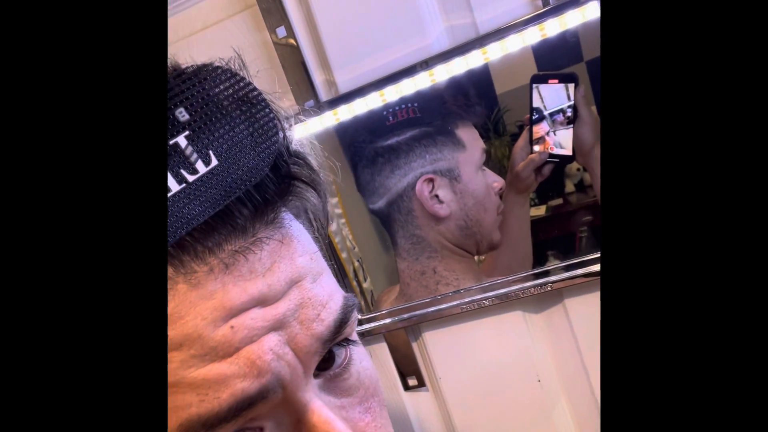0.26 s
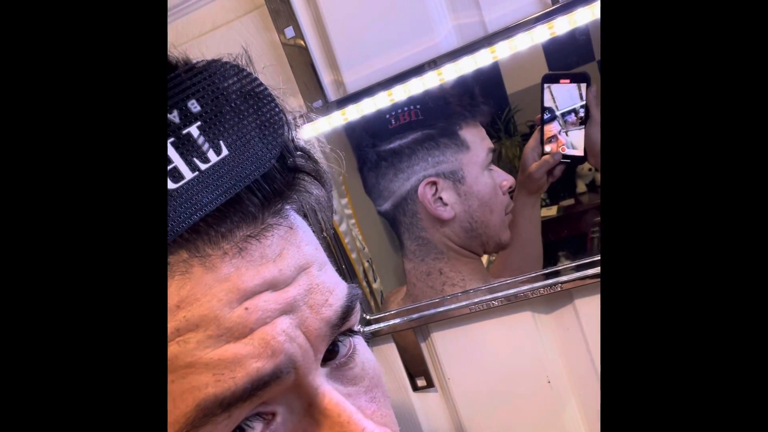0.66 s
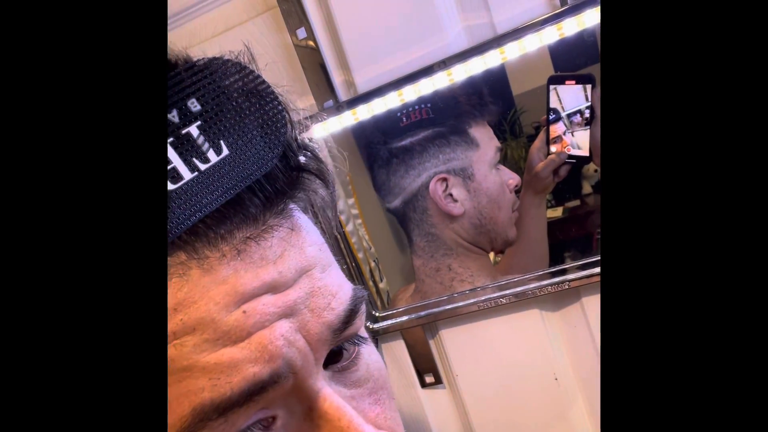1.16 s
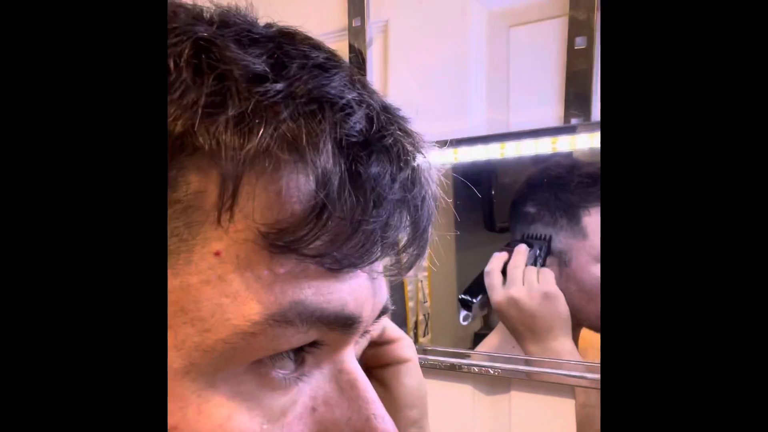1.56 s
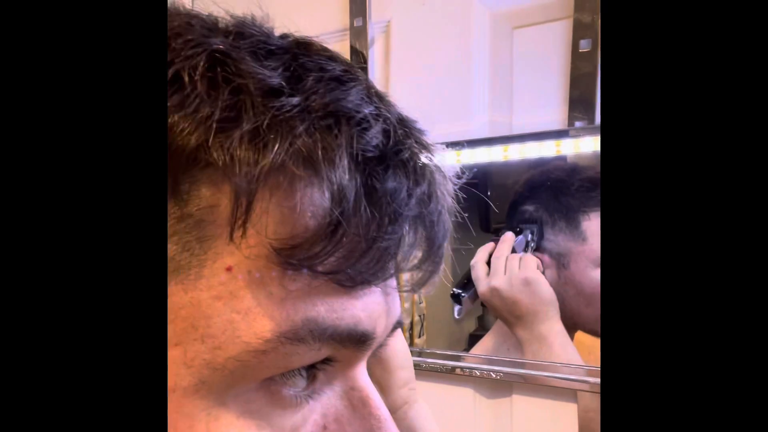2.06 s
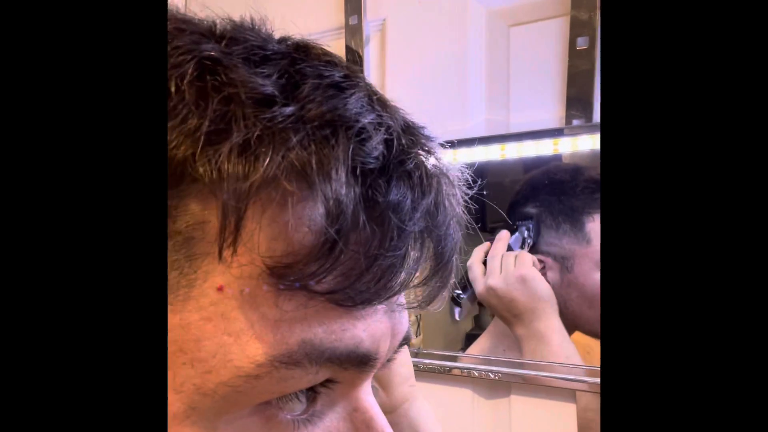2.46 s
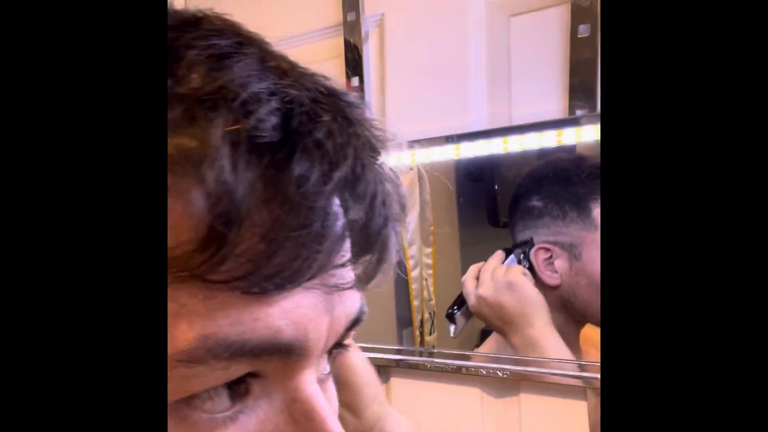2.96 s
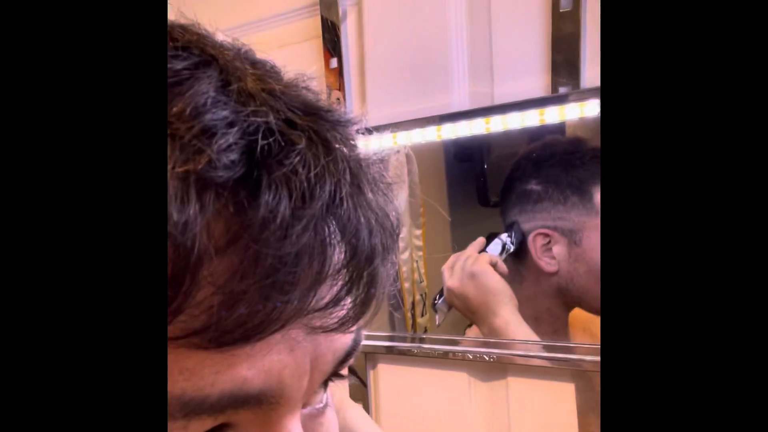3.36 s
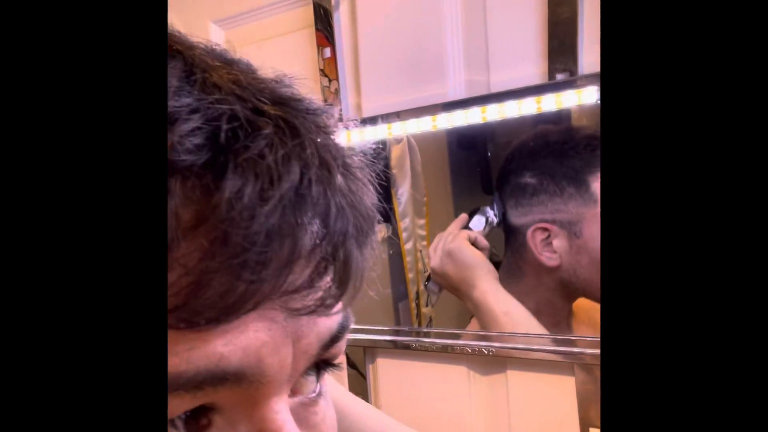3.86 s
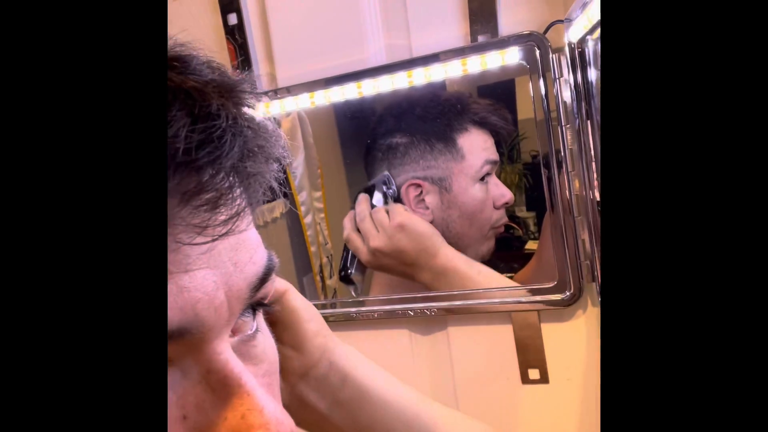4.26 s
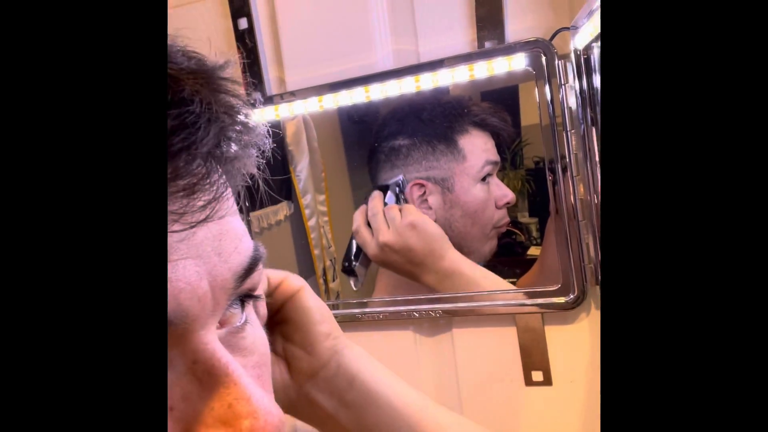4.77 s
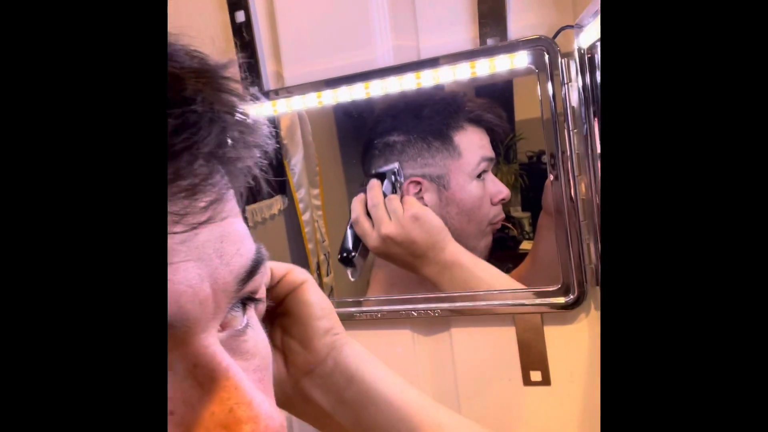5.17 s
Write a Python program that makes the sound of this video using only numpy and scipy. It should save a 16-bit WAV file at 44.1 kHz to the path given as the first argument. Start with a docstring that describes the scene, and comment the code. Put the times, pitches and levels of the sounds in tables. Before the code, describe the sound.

For the first 1.2 seconds there is only very faint room tone, with a soft low handling rumble swelling around 0.6 to 0.8 seconds. At 1.2 a short tap hits the phone: a bright tick falling quickly into a small low thump. At 1.33 the clippers jump in, close and loud, a steady buzz of roughly 105 pulses per second with a strong nasal hum, a whining upper tone, metallic blade clatter, rasp and airy hiss of teeth in hair. Strokes at about 1.75, 2.1, 2.5, 2.8, 3.2 and 3.6 seconds slightly lower and recolour the buzz, most landing with a dull little knock. At 3.9 the sound chops off, leaving a tiny gap, and swells back by 3.97, somewhat softer and differently coloured. This second pass continues with gentler shifts near 4.3, 4.75 and 5.3 seconds, a faint low rustle beneath, still buzzing at the end, about 5.4. Small dry room, slight stereo width.

```python
"""Electric hair clippers at work in a small room, close to a phone, in two passes, the first cut off
sharply, the second swelling in quickly. The motor hums on the orders of its shaft; the blade clacks and
rings at both ends of its travel and rasps in between; its teeth hiss through the hair. Each stroke up the
head slows the motor and shifts the hum's colour. Filtered noise and a falling tone make the quiet opening
and the tap on the phone before the passes."""
import sys
import numpy as np
from scipy import signal
from scipy.fft import rfft, irfft
from scipy.io import wavfile

SR = 44100
rng = np.random.default_rng(int(sys.argv[2]) if len(sys.argv) > 2 else 0)


def transcribe(signal):
    """Save signal, clipped to [-1, 1], as a 16-bit WAV file at the path in sys.argv[1]."""
    frames = np.atleast_2d(signal).T
    limited = np.clip(frames, -1, 1)
    pcm = np.round(limited * 32767).astype(np.int16)
    wavfile.write(sys.argv[1], SR, pcm)


N = 239574
T = np.arange(N) / SR
HZ = np.fft.rfftfreq(N, 1 / SR)

# strongest shaft orders, which reach the phone directly and waver only a little: order
DIRECT_ORDERS = (1, 7, 8, 9, 13, 16)
# hum of the housing with the blade running free: order, relative_level_db
FIRST_HUM = [(1, -21), (2, -42), (3, -21.5), (4, -38), (5, -15), (6, -16.5), (7, -5.5), (8, -10), (9, -12),
             (10, -15.5), (11, -13), (12, -25.5), (13, 3), (14, -13.5), (15, -10.5), (16, -6), (17, -11.5),
             (18, -26.5), (19, -13), (20, -26), (21, -24.5), (22, -34.5)]
SECOND_HUM = [(1, -22.0), (2, -67), (3, -19), (4, -35.5), (5, -18), (6, -14), (7, 4.0), (8, 0), (9, -4),
              (10, -9), (11, -15), (12, -10.5), (13, -2.5), (14, -2.5), (15, -23.5), (16, -9), (17, -6.5),
              (18, -9), (19, -19), (20, -22), (21, -9), (22, -32)]
# blade resonances that the hair damps and frees: pitch_hz
BLADE_MODES = (2750, 3400, 3900, 5700, 6500, 8200, 10000)
# ring of the steel blade before the hand acts on it: order, level_db
FIRST_RING = [(25, -64), (29, -69), (33, -57), (34, -73), (35, -55.5), (36, -59.5), (37, -79), (38, -60)]
SECOND_RING = [(25, -63.5), (28, -66), (30, -64), (31, -62), (32, -69), (33, -67.5), (34, -60), (35, -67),
               (36, -71)]
# spectrum of the blade's clack and rasp: pitch_hz, relative_density_db
FIRST_CLACK = [(2400, -5.5), (2800, -7.5), (3300, -7), (3700, 2), (4300, -11), (4900, 0), (5600, -1.5),
               (6500, -1.5), (7400, -12), (8500, -18), (10000, -19), (11500, -32.5), (15300, -25)]
SECOND_CLACK = [(2400, 0), (2800, 3.5), (3300, -0.5), (3700, -3.5), (4300, -8), (4900, -1.5), (5900, 2.5),
                (6500, -1), (7400, -13), (8500, -3.5), (9200, -10.5), (9700, 0), (10100, -6), (10500, -4.5),
                (11300, -22), (15300, -13)]
# spectrum of the tooth hiss: pitch_hz, relative_density_db
FIRST_HISS = [(60, -41), (150, -15.5), (300, -13), (520, -10), (750, -4), (1400, -1), (2400, -5.5),
              (3700, -9), (4800, -4.5), (6000, -4), (7500, -11.5), (10000, -8.5), (12500, -6), (15300, -24)]
SECOND_HISS = [(60, -34), (150, -21), (300, -10), (520, -19.5), (750, -1), (1400, -5), (2400, -6),
               (3700, -8), (4800, -7), (6000, -10.5), (7500, -8.5), (10000, -8.5), (12500, -12.5),
               (15300, -23)]
# brief dip of the room sound around the start of the first pass: time_s, gain
OPENING_DIP = [(1.308, 1), (1.322, .03), (1.33, .03), (1.36, 1)]
# spectrum of the still room: pitch_hz, relative_density_db
ROOM_SPECTRUM = [(15, -31), (25, -28), (50, -5.5), (75, -5), (181, -15), (354, -15.5), (927, -22.5),
                 (2430, -21), (4040, -24.5), (5010, -36.5), (12100, -46), (15000, -59)]
# low rumble of the hand-held phone: time_s, level_db
RUMBLE_LEVEL = [(0, -71), (.45, -73.5), (.62, -66), (.8, -65.5), (1, -75), (2.5, -75), (3.3, -104),
                (5.4, -82)]
# stereo image of the clippers: pitch_hz, left_minus_right_db, left_lead_rad
STEREO_DIFFERENCE = [(100, -.8, 0), (700, 1.8, -.1), (1300, 3.7, -.55), (2400, .5, -.7), (4100, 0, -.7),
                     (4800, 0, -2.95), (4890, 0, -3.14), (5100, 0, -3.5), (5700, 0, -4), (7400, -.5, -4.2),
                     (10500, 0, -5.6), (11500, 0, -6.2)]
# strokes up the head: start_s, time_to_full_pressure_s, length_s, pressure, tilt (0-1),
# whine_damping_db (negative frees it), landing_knock (0-1)
STROKES = [(1.325, .11, 0.23, 0.45, 0.07, 0, 0.02), (1.752, 0.091, 0.22, 0.86, 0.08, 6, 1),
           (2.096, 0.12, 0.24, 0.7, 0, 1, 0.99), (2.504, 0.055, .34, 0.91, 0, 4.5, .66),
           (2.761, .13, 0.47, 1.08, .85, 3.5, 0.45), (3.189, 0.05, 0.31, 0.65, .25, -0.5, 1),
           (3.561, 0.065, .23, 0.66, .2, -0.5, 0.76), (3.951, 0.055, 0.26, 0.84, 0, 8, 0),
           (4.291, 0.082, 0.2336, 0.76, 0, 2, 0.05), (4.5, 0.25, 0.29, 0.95, 0.1, 0, 0.01),
           (4.756, 0.05, .23, 0.39, 0, 0, 0.32), (5.334, 0.061, 0.26, .57, 0, 2, 0.06)]
# where the hand works on the head: time_s, place (0 = middle of the pass)
FIRST_PLACE = [(1.33, -0.18), (2.6, -0.06), (3.25, 1)]
SECOND_PLACE = [(4.8, -0.33), (5.15, 0.73), (5.43, 0.0035)]
# orders that answer to the hand: order, per_pressure_db, per_tilt_db, per_place_db
FIRST_ANSWER = [(1, -3.5, 10.5, -11.0), (5, 2, 2.5, -6.0), (7, -3.5, -8.5, -0.5), (8, -1, 0.5, 3.5),
                (9, 12.5, -2.5, 3.0), (10, -4.5, -5, 2.5), (11, -17.5, 17, -8.5), (12, 14.5, -10, -1.5),
                (13, -2.5, 4.5, 0.0), (14, -1.5, 8, 1.0), (15, 1.5, 3.5, -5.5), (16, -1.5, -1, -3.5),
                (17, -2, -7, 4), (19, -3.5, 6.5, 4.0)]
SECOND_ANSWER = [(1, 1.5, 0.0, 6), (7, -1.5, 0.0, -1), (8, -2, 0.0, -2), (9, -14, 0.0, -2.5),
                 (10, -2.5, 0.0, 0), (12, 6, 0.0, -1), (13, -3.5, 0.0, -4.5), (14, -0.5, 0.0, -3.5),
                 (15, 23.5, 0.0, 8), (17, 1, 0.0, -2.0), (18, 3, 0.0, 0.5), (21, -6, 0.0, 1)]
# rows for clack and cutting: per_pressure_db, per_tilt_db, per_place_db
FIRST_BLADE = [(4, -3.5, 1.5), (0.5, -0.5, -1.5)]
SECOND_BLADE = [(1.1, 0, 0.29), (4.3, 0, 2.9)]
# soft low rustles: peak_s, half_length_s, level_db
RUSTLES = [(3.812, 0.17, -64.5), (5.147, 0.17, -65)]

TAP_S, FIRST_S, FIRST_END_S, SECOND_S = 1.2098, 1.33, 3.9, 3.935
ROOM_DB = -69
TICK_DB, TICK_S = -42.5, .0035  # the tap's noise burst and its decay
# landing time of the blade, and the share of the pressure taken by then (before smoothing)
LAND_S, LAND_SHARE = 0.0086, 0.442
# scales of the shaft's unevenness and of each clack's lateness (cycles)
SHAFT_WAVER, BLADE_SLACK = .0006, .0003
# scale for the rate of reflection changes with hand travel; rate of tufts reaching the teeth (per s)
RESTLESS, TUFTS_PER_S = 1.8, 14
HUM_SCATTER = .38  # reflected hum, against 1 for the direct sound
WHINE_ORDER = 13  # the shaft order whose level the whine damping sets
BLADE_WET = .65  # strength of the blade's reflections against its direct sound
# scale of the ring's wavering (dB); bunching of the hiss at each stroke
RING_WAVER_DB, TEETH_BUNCH = 1.6, .6
EDGE_HZ = 15710  # middle of the recorder's upper band edge


def gain_of(db):
    """Decibel law: 20 dB is a tenfold amplitude."""
    return 10 ** (np.asarray(db) / 20)


def evened(x):
    """Normalization to unit root-mean-square amplitude."""
    return x / np.sqrt(np.mean(abs(x) ** 2) + 1e-20)


def curves(rows):
    """Linear interpolation in time: each column of a table at every sample."""
    s, *columns = np.transpose(rows)
    return [np.interp(T, s, c) for c in columns]


def spectra(rows):
    """Interpolation over logarithmic frequency: each column of a table at every bin."""
    f, *columns = np.transpose(rows)
    return [np.interp(np.log(HZ + 1), np.log(f + 1), c) for c in columns]


def coloured(x, points, low_hz):
    """Linear filtering: shapes the spectrum of x, with a steep edge below low_hz, at rms 1."""
    edge = 1 / np.sqrt(1 + (low_hz / (HZ + 1)) ** 16)
    return evened(irfft(rfft(x) * gain_of(spectra(points)[0]) * edge, N))


def drift(place, count=6):
    """Superposition of slow waves: a smooth complex wander, changing about once per unit of place."""
    coarse = place[::100, None]
    phase = coarse * rng.uniform(-1, 1, count) + rng.random(count)
    waves = np.exp(2j * np.pi * phase).sum(1)
    return np.interp(T, T[::100], waves) / np.sqrt(count)


def still_room(apart=.4, rumble_apart=.65, rumble_balance_db=-3):
    """Partly coherent noise: faint room tone and the low rumble of the hand-held phone."""
    common, side, low, low_side = rng.standard_normal((4, N))
    air = common + apart * np.array([side, -side])
    air = gain_of(ROOM_DB) * coloured(air, ROOM_SPECTRUM, low_hz=25)
    low = low + rumble_apart * np.array([low_side, -low_side])
    rumble_points = [(40, -27), (60, 2.0), (75, 6.0), (95, -12.0), (200, -27), (800, -68)]
    rumble = coloured(low, rumble_points, low_hz=30)
    balance_db = rumble_balance_db / 2 * np.array([[1], [-1]])
    return air + gain_of(curves(RUMBLE_LEVEL)[0] + balance_db) * rumble


def tap(top_hz=2730, boom_hz=70, fall_s=0.0072, boom_db=-40.0, rise_s=0.0017, hold_s=0.017, decay_s=0.012,
        ring_db=-52, ring_s=0.06, tail_db=-63, tail_s=0.063, echo=0.19, echo_s=0.00091, balance_db=-4):
    """Falling sweep and noise burst: a tap on the phone, treble first, bass lagging and ringing on, faint room
    answer."""
    age = np.maximum(T - TAP_S, 0)
    hz = boom_hz + (top_hz - boom_hz) / (1 + age / fall_s) ** 4
    size = gain_of(boom_db) * np.exp(-np.maximum(age - hold_s, 0) / decay_s)
    size = size + gain_of(ring_db) * np.exp(-age / ring_s)
    boom = np.minimum(age / rise_s, 1) * size * np.sin(2 * np.pi * np.cumsum(hz * (age > 0)) / SR)
    # a close reflection splits the boom into separate bands
    boom = (boom + echo * np.interp(T - echo_s, T, boom)) / np.hypot(1, echo)
    burst = gain_of(TICK_DB) * np.exp(-age / TICK_S)
    burst = burst + gain_of(tail_db) * np.exp(-age / tail_s) * (age > .002)
    tick_points = [(650, 11), (1050, 12), (1600, 0), (2100, 7), (2800, -9), (5000, -11), (14000, -56)]
    noise = coloured(rng.standard_normal(N), tick_points, low_hz=300)
    balance = gain_of([[balance_db / 2], [-balance_db / 2]])
    return (age > 0) * (T < FIRST_S) * (boom + burst * noise) * balance


def touches():
    """Impact events: start_s and strength of the strokes that land with a knock."""
    return [(row[0], row[-1]) for row in STROKES if row[-1] > 0]


def bumps(peak_db=-50.0, decay_s=0.013):
    """Resonance under impact: noise around 850 Hz as each touch knocks the housing's main resonance."""
    points = [(400, -29), (850, 21), (1200, -21), (3000, -2)]
    noise = coloured(rng.standard_normal(N), points, low_hz=350)
    knocks = sum(size * np.exp(-abs(T - s) / decay_s) for s, size in touches())
    return gain_of(peak_db) * knocks * noise


def jolt(relax_s=0.056):
    """Relaxation: each touch loads the housing at once; the load then eases off exponentially."""
    load = 0
    for s, size in touches():
        onset = np.clip((T - s) / LAND_S + .5, 0, 1)
        load = load + size * onset * np.exp(-np.maximum(T - s, 0) / relax_s)
    return load


def hand(place):
    """Contact loading (pressure, tilt, place, whine damping): each stroke lands, bears down and lifts."""
    pressure, tilt, damping_db = np.zeros((3, N))
    for start, rise, length, press, lean, damp_db, _ in STROKES:
        contact = np.interp(T - start, [-LAND_S / 2, LAND_S / 2, rise, length], [0, LAND_SHARE, 1, 0])
        contact = (contact + np.sin(np.pi / 2 * contact) ** 2) / 2
        pressure = pressure + press * contact
        tilt = tilt + lean * contact
        damping_db = damping_db + damp_db * contact ** 8
    return np.array([pressure, tilt, curves(place)[0], damping_db])


def hand_travel(speed, jump):
    """Kinematics of the hand: it glides at speed (units per s) and jerks at each touch."""
    return speed * T + jump * sum(size * np.clip((T - s) / LAND_S + .5, 0, 1) for s, size in touches())


def hum(turns, orders, level_db, answer, grip, travel, ringing,
        apart=0.23, shove=2.1, choke_db=2, waver_db=1.55):
    """Harmonic excitation and interference: the grip damps or frees shaft orders; reflections vary them."""
    k, db = np.transpose(orders)
    grip_db = {round(order): np.dot(slopes, grip[:3]) for order, *slopes in answer}
    grip_db[WHINE_ORDER] = grip_db[WHINE_ORDER] - grip[3]
    # the housing rings after each kick of the motor, which sets the lag of each order
    circle = np.r_[db[0], db, db[::-1]]
    lag = -ringing * signal.hilbert(circle * np.log(10) / 20).imag[1:]
    load = shove * jolt()
    out = np.zeros((2, N))
    for i, order in enumerate(np.round(k)):
        # a touch drags (rad) and chokes the orders around the housing's main resonance
        drag = load * np.exp(-((order - 7.5) / 1.5) ** 2)
        size = gain_of(level_db + db[i] + grip_db.get(order, 0) - choke_db * drag)
        path = (1 + HUM_SCATTER * drift(2 * RESTLESS * travel)) / np.hypot(1, HUM_SCATTER)
        if order in DIRECT_ORDERS:
            path = np.exp(.4j * path.imag) * gain_of(waver_db * drift(2 * RESTLESS * travel).real)
        elif order < 7:
            path = (2 + path) / 3  # long waves hardly notice the hand's motion
        phase = 2 * np.pi * order * turns + lag[i] - drag
        tone = np.sqrt(2) * size * np.exp(1j * phase)
        side = apart * order / len(k) * (tone * drift(travel)).real
        out += (tone * path).real + np.array([side, -side])
    return out


def clacks(turns, back_stroke, uneven=0.14, back_at=.48):
    """Periodic impact: a click at each end of the blade's travel, loose in time and strength; a row per end."""
    out = np.zeros((2, N))
    near = np.arange(-8, 9)
    for end, offset, size in zip(out, (0, back_at), (1, back_stroke)):
        cycles = np.arange(2, int(turns[-1]) - 1)
        late, force = rng.standard_normal((len(cycles), 2)).T
        at = np.interp(cycles + offset + BLADE_SLACK * late, turns, np.arange(N))[:, None]
        index = at.astype(int) + near
        strength = size * (1 + uneven * force[:, None])
        # windowed sinc places each click between samples
        np.add.at(end, index, strength * np.sinc(index - at) * np.hanning(len(near)))
    return out


def in_room(ends, travel, ring_s=0.0023, top_ring_s=0.00051, t60=0.17, apart=0.81, count=4):
    """Convolution: a short ring for each blade end, then reflections that change as the hand travels."""
    t = np.arange(SR // 6) / SR
    # the ring is shortest in the top treble
    top = np.interp(np.fft.rfftfreq(len(t), 1 / SR), [4000, 7500], [0, 1])
    decays = np.exp(-t / np.array([[[ring_s]], [[top_ring_s]]]))
    slow, quick = rfft(rng.standard_normal((2, 2, len(t))) * decays)
    ring = (1 - top) * slow + top * quick
    # a flat magnitude smears each click with little colouring
    ring = irfft(ring / abs(ring), len(t)) * (t < 10 * ring_s)
    x = signal.oaconvolve(ends, ring, axes=1).sum(0)[:N]
    out = x * np.ones((2, 1))
    for i in range(count):
        common, side = rng.standard_normal((2, len(t)))
        tail = (common + apart * np.array([side, -side])) * gain_of(-60 * t / t60) * (t > .003)
        tail = tail / np.linalg.norm(tail[0])
        nearness = np.maximum(np.cos(2 * np.pi * (travel - i / count)), 0)
        out += BLADE_WET * nearness * signal.oaconvolve(x[None], tail, axes=1)[:, :N]
    return evened(out)


def scrape(turns, travel, bunched=0.4, size=8192, count=3):
    """Sliding friction: the same rough steel repeats each turn as a rasp; its grain changes as hair passes."""
    profiles = np.fft.ifft(np.exp(2j * np.pi * rng.random((count, 150))), size)
    at = (turns % 1 * size).astype(int)
    rasp = sum((profile[at] * drift(travel)).real for profile in profiles)
    return evened(rasp * (1 + bunched * np.cos(4 * np.pi * (turns - .1))))


def shifting(x, depth=0.23, sharpness=5.7, changes_per_s=6.0):
    """Variable damping: blade resonances each swell and dull as hair and skin press against it."""
    rings = (signal.lfilter(*signal.iirpeak(hz, sharpness, fs=SR), x) for hz in BLADE_MODES)
    return evened(x + depth * sum(drift(changes_per_s * T).real * ring for ring in rings))


def blade_ring(turns, rows, travel, grip, press_db=2.4, tilt_db=2.0, place_db=1.3, at=0.1011):
    """Phase-locked harmonics: high shaft orders of the steel pulse together and reach the phone directly."""
    ring = 0
    for order, db in rows:
        size = gain_of(db + RING_WAVER_DB * drift(2 * RESTLESS * travel).real)
        ring = ring + size * np.cos(2 * np.pi * round(order) * (turns - at))
    return np.sqrt(2) * gain_of(np.dot([press_db, tilt_db, place_db], grip[:3])) * ring


def teeth(turns, points, snip_db=-1.0, apart=0.88):
    """Modulated noise: the hiss of teeth shearing hairs, in grains that bunch at each stroke."""
    stroke = 1 + TEETH_BUNCH * np.cos(2 * np.pi * (turns - .03)) ** 8
    grains = np.repeat(rng.standard_normal(N // 32 + 1), 32)[:N]
    common, side = rng.standard_normal((2, N)) * stroke * gain_of(snip_db * grains)
    return coloured(common + apart * np.array([side, -side]), points, low_hz=45)


def stereo_image(x):
    """Stereo image: level and phase differences between left and right, opposed near 4.9 kHz."""
    balance_db, lead = spectra(STEREO_DIFFERENCE)
    left = gain_of(balance_db / 2) * np.exp(1j * lead / 2)
    pair = rfft(x)
    unlike = np.interp(HZ, [4500, 4800, 5000, 5300], [1, 0, 0, 1])
    middle = pair.mean(0)
    pair = (middle + unlike * (pair - middle)) * np.array([left, 1 / left])
    # the top treble is set in the centre
    width = np.interp(HZ, [10200, 11200], [1, 0])
    middle = pair.mean(0)
    return irfft(middle + width * (pair - middle), N)


def clippers(grip, travel, orders, answer, blade_answer, ring, clack, hiss, free_hz, sag_hz, hum_db, clack_db,
             bite_db, hiss_db, ringing, back_stroke, rasp, flutter_db):
    """Common drive: hum and blade sound of one pass follow one shaft, which slows under pressure."""
    speed = free_hz - sag_hz * grip[0]
    turns = np.cumsum(speed) / SR + SHAFT_WAVER * drift(25 * T, count=30).real
    housing = hum(turns, orders, hum_db, answer, grip, travel, ringing)
    flutter = flutter_db * drift(TUFTS_PER_S * T, count=12).real
    blade, shear = np.dot(blade_answer, grip[:3]) + flutter
    steel = in_room(clacks(turns, back_stroke), travel / 2) + rasp * scrape(turns, travel)
    steel = shifting(coloured(steel, clack, low_hz=2360))
    # the top of each clack, like the hiss, follows how the teeth bite into the hair
    bite = irfft(rfft(steel) * np.clip((HZ - 6500) / 1500, 0, 1), N)
    cutting = gain_of(bite_db) * evened(bite) + gain_of(hiss_db) * teeth(turns, hiss)
    clacking = gain_of(blade + clack_db) * (steel - bite) + blade_ring(turns, ring, travel, grip)
    return stereo_image(housing), stereo_image(clacking + gain_of(shear) * cutting)


def fade_in(start, fade_s, step=0, bend=1.8):
    """Onset envelope: a pass opens with a small step and swells to full level."""
    return (T > start) * (step + (1 - step) * np.clip((T - start) / fade_s, 0, 1) ** bend)


def cut_off(decay_s):
    """Cut: the first pass stops sharply, and a faint treble fades out over a few hundredths of a second."""
    return np.exp(-np.maximum(T - FIRST_END_S, 0) / decay_s)


def rustle():
    """Enveloped low noise: soft rustles swell and fade under the buzz."""
    points = [(100, -12), (220, -2), (380, -2), (800, -26), (3000, -45)]
    noise = coloured(rng.standard_normal(N), points, low_hz=90)
    return noise * sum(gain_of(db) * np.exp(-((T - s) / length) ** 2) for s, length, db in RUSTLES)


def scene():
    """Superposition: the quiet opening with its tap, then the two passes."""
    first_hum, first_blade = clippers(
        hand(FIRST_PLACE), hand_travel(speed=2.397, jump=0.13), FIRST_HUM, FIRST_ANSWER, FIRST_BLADE,
        FIRST_RING, FIRST_CLACK, FIRST_HISS, free_hz=105.54, sag_hz=0.93, hum_db=-38.0, clack_db=-43.5,
        bite_db=-53, hiss_db=-49.0, ringing=0.92, back_stroke=1.0, rasp=0.39, flutter_db=1.0)
    second_hum, second_blade = clippers(
        hand(SECOND_PLACE), hand_travel(speed=1.6, jump=0.2057), SECOND_HUM, SECOND_ANSWER, SECOND_BLADE,
        SECOND_RING, SECOND_CLACK, SECOND_HISS, free_hz=106.3, sag_hz=.25, hum_db=-40.0, clack_db=-46.5,
        bite_db=-55.0, hiss_db=-51.0, ringing=0.9, back_stroke=0.93, rasp=0.59, flutter_db=1.0)
    low = rustle()
    first = cut_off(decay_s=0.00048) * (first_hum + low) + cut_off(decay_s=0.014) * first_blade
    first = fade_in(FIRST_S, fade_s=0.035, step=0.076) * first
    second = second_hum + low + second_blade
    second = fade_in(SECOND_S, fade_s=0.03, step=0.059, bend=1.66) * second
    opening = (tap() + still_room()) * curves(OPENING_DIP)[0]
    return first + second + bumps() + opening


def record(dry):
    """Band limiting: the recorder passes nothing above its upper edge."""
    passed = np.clip((EDGE_HZ - np.fft.rfftfreq(2 * N, 1 / SR)) / 200 + .5, 0, 1)
    return irfft(rfft(dry, 2 * N) * passed, 2 * N)[:, :N]


dry = scene()
out = record(dry)
transcribe(out)
```